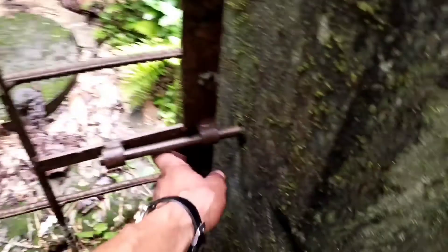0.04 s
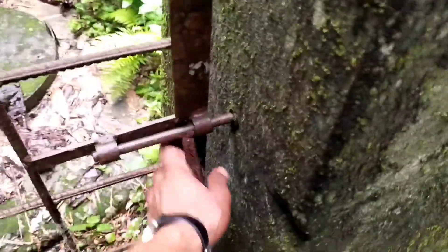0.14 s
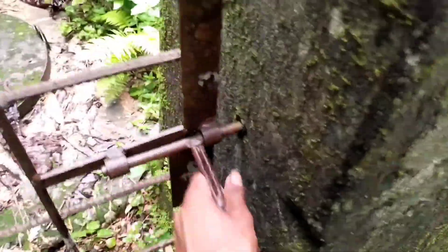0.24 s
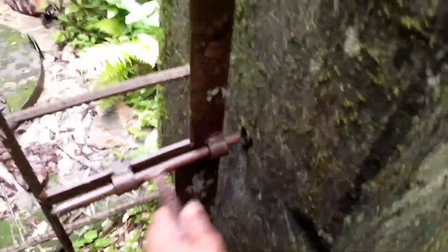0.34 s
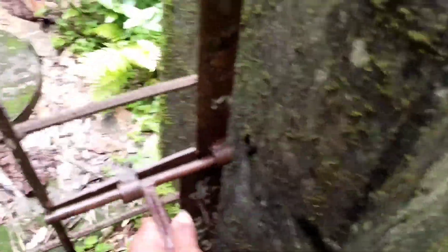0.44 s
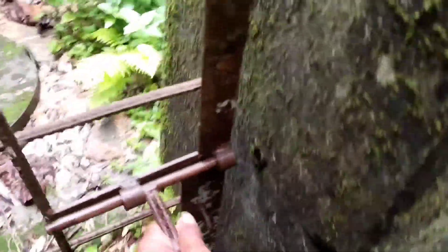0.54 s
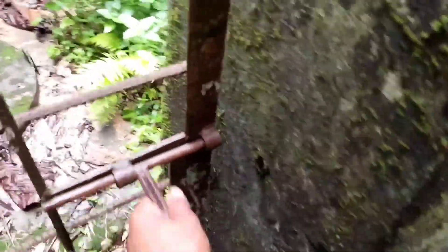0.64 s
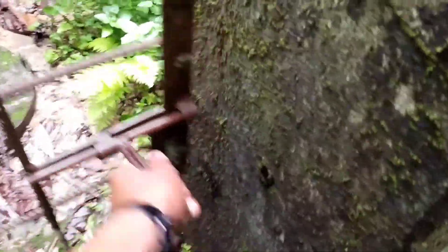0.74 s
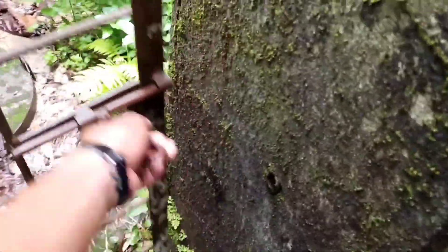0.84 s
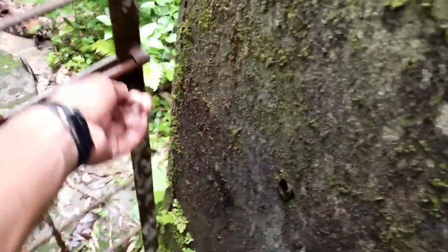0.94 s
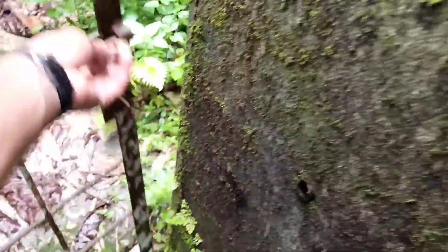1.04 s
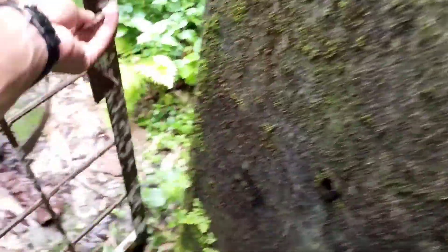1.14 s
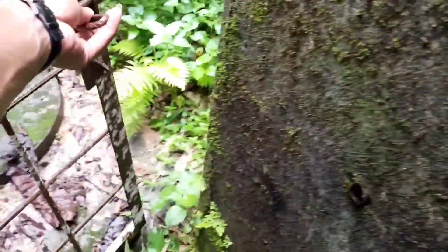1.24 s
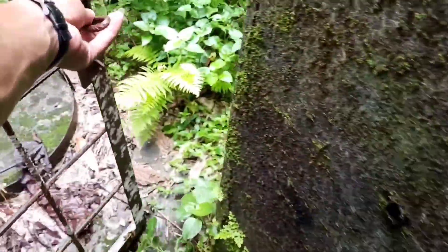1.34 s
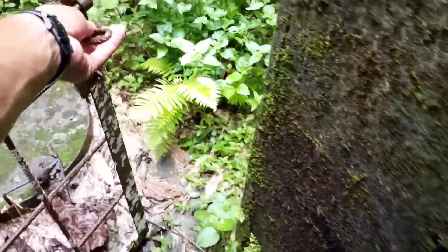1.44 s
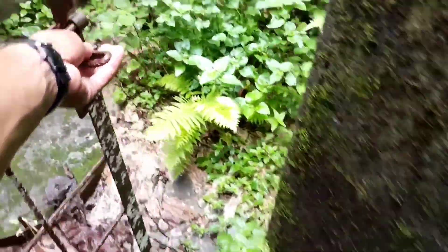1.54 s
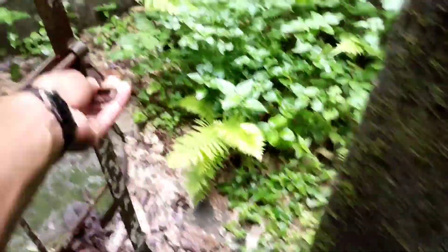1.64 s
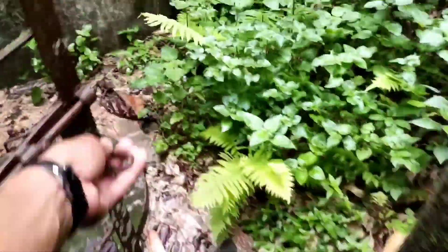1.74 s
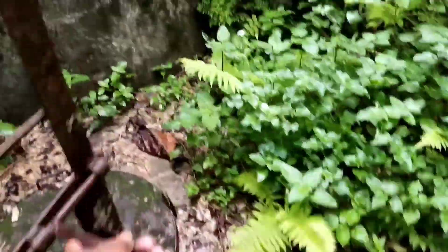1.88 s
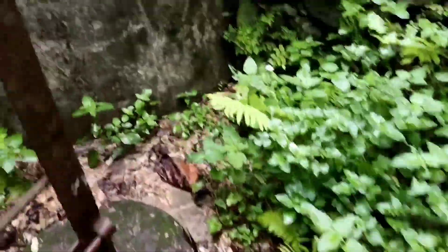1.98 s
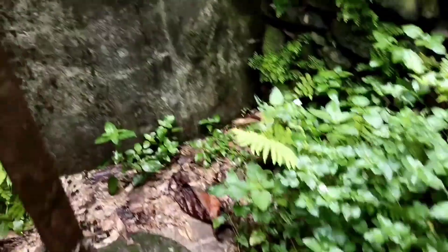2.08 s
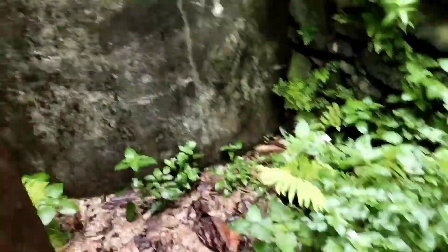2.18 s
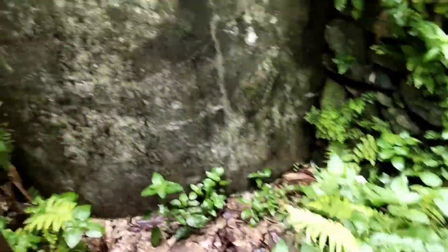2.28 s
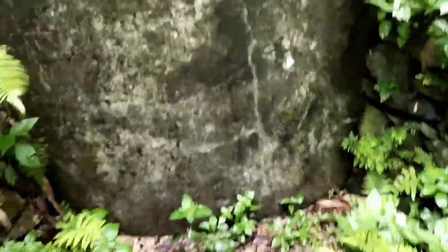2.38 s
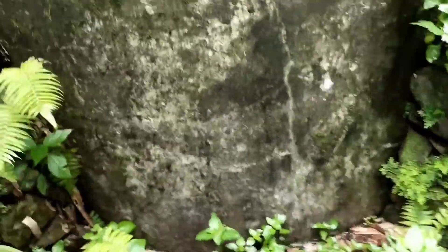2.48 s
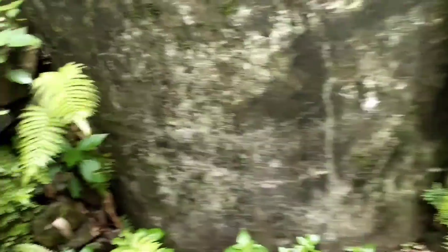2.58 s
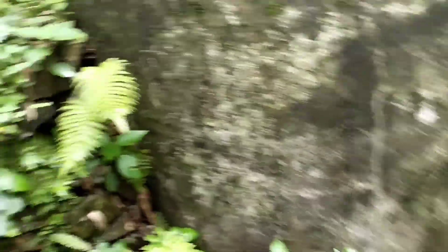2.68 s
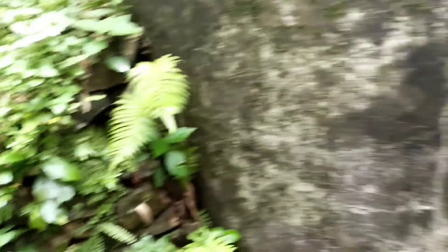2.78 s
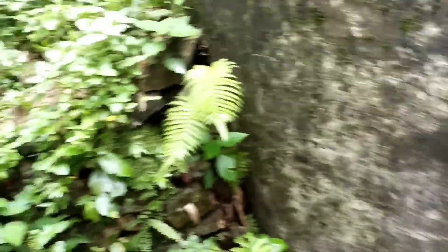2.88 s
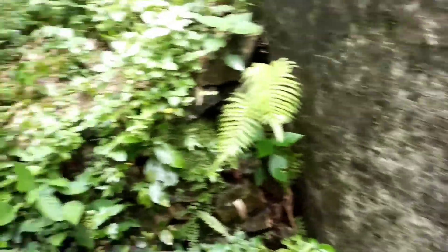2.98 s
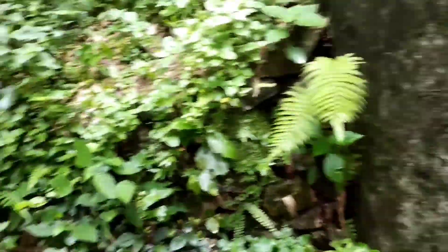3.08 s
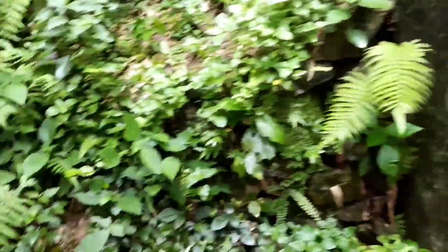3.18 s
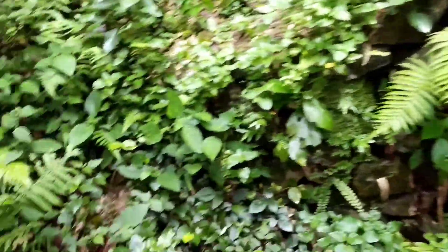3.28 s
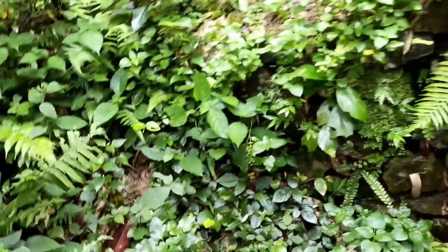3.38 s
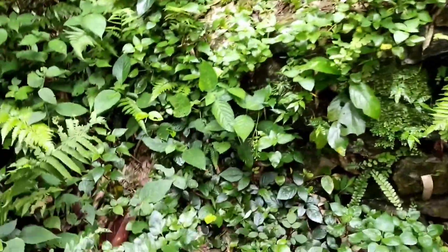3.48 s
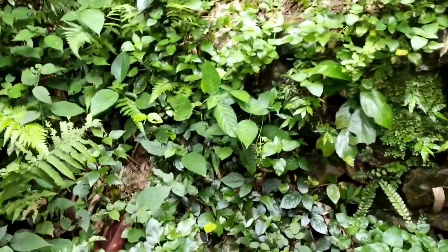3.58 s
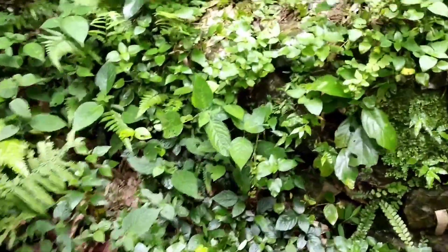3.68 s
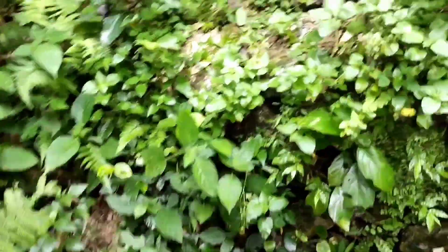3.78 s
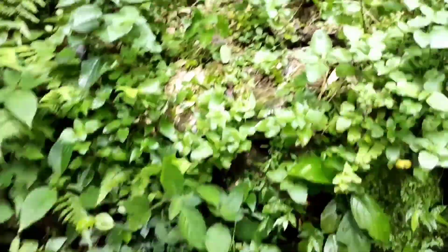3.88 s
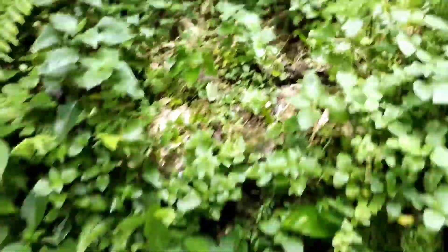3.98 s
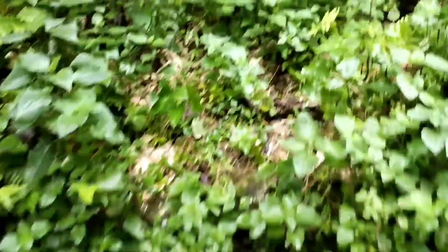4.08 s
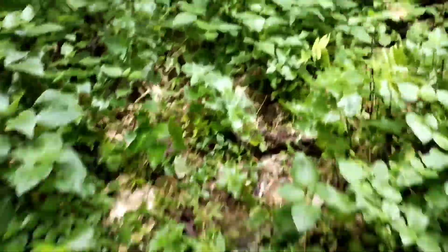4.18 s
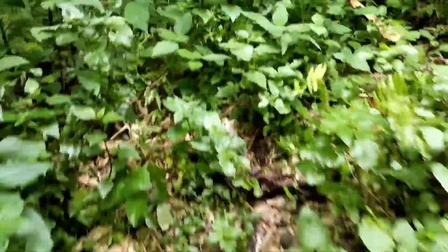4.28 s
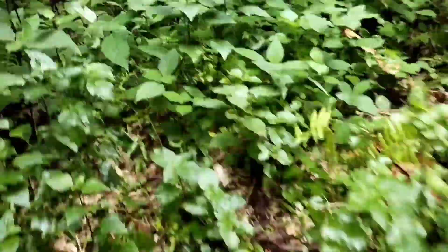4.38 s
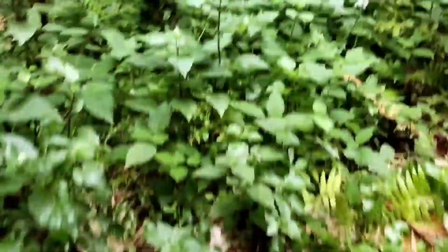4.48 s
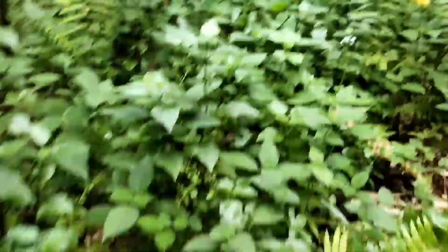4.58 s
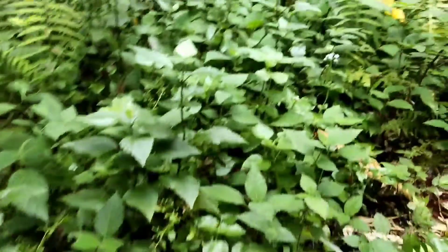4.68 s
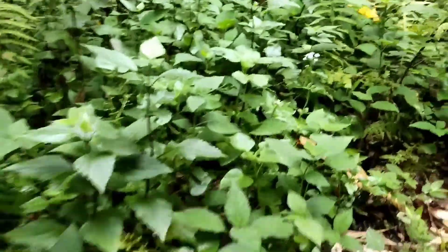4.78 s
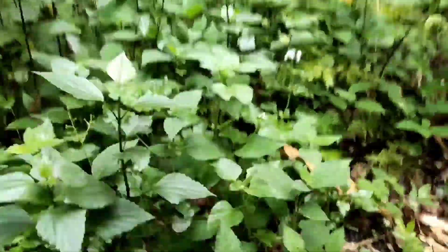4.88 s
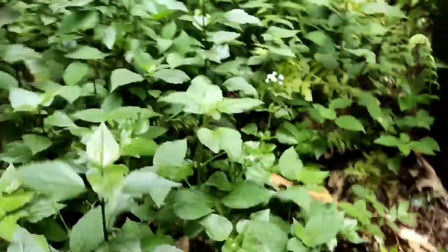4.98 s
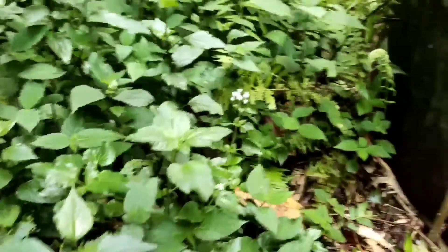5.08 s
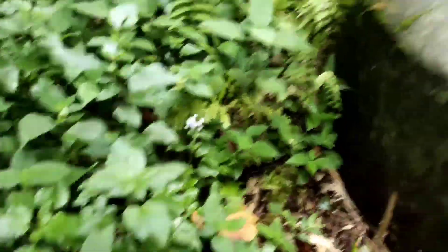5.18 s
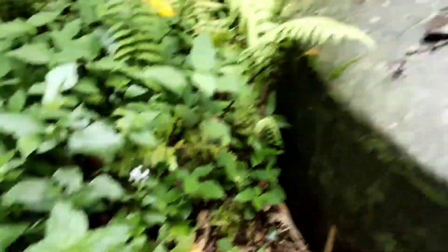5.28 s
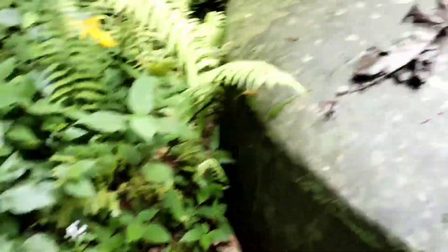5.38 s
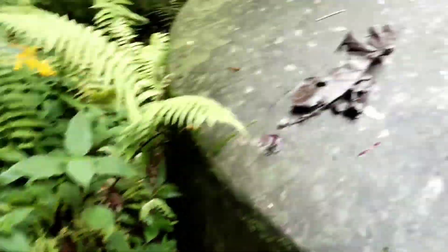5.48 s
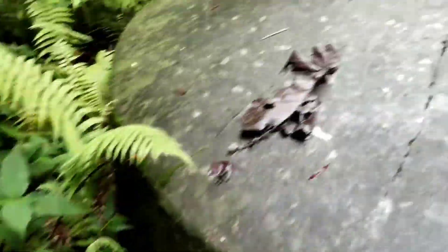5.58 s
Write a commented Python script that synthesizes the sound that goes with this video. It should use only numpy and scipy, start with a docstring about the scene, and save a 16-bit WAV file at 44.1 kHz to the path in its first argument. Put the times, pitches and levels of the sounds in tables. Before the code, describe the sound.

A close, handheld stereo recording in open, leafy surroundings. From 0.2 s a rusty iron bolt grates in uneven stick-slip clicks, with clinks at 0.27, 0.37 and 0.43 s and a quick pair near 0.5 s. At 0.54 s it hits its stop with the loudest, brightest clank; another knock follows at 0.64 s. The barred gate rings densely, inharmonically, and is stilled from about 0.9 s. Small dry clicks come around 1.0 s with a faint scrape. From 1.2 to 2.7 s there is low grip rubbing, soft rumble and leafy swishes, with a strong finger thump on the recorder at 2.3 s. Light iron rattles at 2.74 and 2.94 s lead to a hard double bang at 3.33 s, ringing away. Then undergrowth rustles, stones knock dully at 4.23, 4.64-4.77 and 4.9 s, and handling bumps end it at 5.6 s. Thin insect hiss continues throughout, ducking after loud peaks.

```python
"""Rusty bolt and barred gate

A rusty iron bolt scrapes back and clanks on its stop; the barred gate rings, rattles and later bangs: blows
and stick-slip clicks excite decaying modes and a dense crowd of lesser ones. A walk through undergrowth is
filtered noise (rustle, low wind and grip rubbing, far insects) with stones as dull modal knocks.
Fingers tapping the recorder are damped swings with a thin tick."""
import sys
import numpy as np
from scipy import signal
from scipy.fft import rfft, irfft
from scipy.io import wavfile
from scipy.ndimage import uniform_filter1d

SR = 44100
rng = np.random.default_rng(int(sys.argv[2]) if len(sys.argv) > 2 else 0)


def master(y):
    """Save y as 16-bit WAV."""
    cut = np.clip(np.atleast_2d(y).T, -1, 1)
    pcm = np.round(cut * 32767)  # scale
    wavfile.write(sys.argv[1], SR, pcm.astype(np.int16))


N = 248555


def gain_of(db):
    """Amplitude factor of a level in dB."""
    return 10 ** (np.asarray(db) / 20)


def evened(x):
    """Scales to an RMS of 1."""
    return x / np.sqrt(np.mean(abs(x) ** 2) + 1e-20)


def read(points, hz):
    """Interpolates a (frequency, value) table over log frequency."""
    f, value = np.transpose(points)
    return np.interp(np.log(hz + 1), np.log(f + 1), value)


def add(mix, start_s, sound):
    """Adds a two-channel sound in place, cut at the end of the mix."""
    part = mix[:, round(start_s * SR):][:, :sound.shape[1]]
    part += sound[:, :part.shape[1]]


def sides(pan_db):
    """Left and right gains for a left-right level difference."""
    return gain_of(np.multiply.outer([.5, -.5], pan_db))


def swell(t, start_s, length_s, attack_s, release_s):
    """Rises linearly, holds and dies exponentially."""
    rise = np.clip((t - start_s) / attack_s, 0, 1)
    return rise * np.exp(-np.maximum(t - start_s - length_s, 0) / release_s)


def hiss(spectrum, level, size, patchy_db, flicker_db):
    """Two-channel noise from random short-time spectra; level(t, hz) shapes it, patches drift, frames flicker."""
    # likeness of left and right noise: (frequency [Hz], correlation [0-1])
    likeness = [(60, 0.34), (180, 0.96), (550, 0.7), (1650, 0.012), (4970, 0.013), (15000, 0.03)]
    hop = size // 4
    frames, hz = N // hop + 5, np.fft.rfftfreq(size, 1 / SR)[:, None]
    a, b, c, d, patches = rng.standard_normal((frames, len(hz), 5)).T
    patches = uniform_filter1d(patches, size=size // 80, axis=0)
    patches = evened(uniform_filter1d(patches, size=9, axis=1))
    same = read(likeness, hz)
    left = a + 1j * b
    right = same * left + np.sqrt(1 - same ** 2) * (c + 1j * d)
    z = np.array([left, right])
    z *= gain_of(read(spectrum, hz) + patchy_db * patches + flicker_db * rng.standard_normal(frames))
    plain = signal.istft(z[0], nperseg=size, noverlap=size - hop)[1]
    z *= level(np.arange(frames) * hop / SR, hz) / np.sqrt(np.mean(plain ** 2))
    return signal.istft(z, nperseg=size, noverlap=size - hop)[1][:, :N]


def rustle():
    """Patchy friction noise of undergrowth; the treble share follows what is brushed."""
    # noise colour of leaves: (frequency [Hz], density [dB per Hz])
    leaf_spectrum = [(180, 2.5), (300, 7.5), (433, 6), (762, 2.5), (1030, 7.5), (1900, -3), (2570, -9),
                     (3640, -17.5), (5800, -12.5), (14700, -33), (16000, -41)]
    # brushes: (start [s], length [s], level [dB], treble lift [dB], left-right [dB])
    brushes = [(0, 0.21, -55.5, 20.5, 5.7), (1.2, 0.17, -59.5, 20.5, 4.9), (1.607, 0.13, -50.5, 19, 1.5),
               (1.8, 0.19, -59.5, 22.5, 5.5), (2.095, 0.15, -56, 23, 2.7), (2.231, 0.027, -38.5, 2.5, 0.44),
               (2.399, 0.14, -57, 17, 2), (3.7, 0.14, -69, 26.5, 6.1), (4.302, 0.079, -58.5, 22.5, 2.9),
               (4.38, 0.025, -50, 13.5, 2), (4.47, 0.016, -50.5, 6, 1.7), (4.64, 0.054, -48, -35, 1.6),
               (4.78, 0.27, -60.5, 21, 3.9), (4.928, 0.061, -44.5, 9.5, 2), (5.3, 0.16, -57, -26, 1)]
    sweep_in_s, sweep_out_s = 0.012, 0.077
    stir_db, stir_treble_db, stir_pan_db = -70.5, 24, 8  # the faint brushing that never stops

    def level(t, hz):
        treble = np.clip(np.log2(hz / 1174.0 + 1e-3), 0, 1)
        stir = gain_of(stir_db + treble * stir_treble_db) * sides(stir_pan_db)[:, None, None]
        power = stir ** 2
        for start_s, length_s, db, treble_db, pan_db in brushes:
            brush = gain_of(db + treble * treble_db) * swell(t, start_s, length_s, sweep_in_s, sweep_out_s)
            power = power + (brush * sides(pan_db)[:, None, None]) ** 2
        return np.sqrt(power)
    return hiss(leaf_spectrum, level, size=512, patchy_db=3.0, flicker_db=-1.9)


def wind():
    """Lumpy low noise in gusts; each shift of the grip adds a band of low rubbing."""
    # noise colour: (frequency [Hz], density [dB per Hz])
    rumble_spectrum = [(12, -62), (20, -32), (38, -81), (87, -1), (192, -7.5), (426, -11.5), (604, -10),
                       (654, -53), (900, -5), (1170, -41), (1980, -120)]
    # level of the low rumble, dipping while the iron is loud: (time [s], level [dB])
    rumble_levels = [(0, -51), (.12, -55), (.3, -76), (.8, -60), (.95, -41.5), (1.25, -51.5), (1.6, -48.5),
                     (2.1, -52), (2.5, -58.5), (2.95, -67), (3.2, -46.5), (3.31, -49.5), (3.38, -76),
                     (3.62, -61), (3.86, -47), (4.5, -46), (5.0, -44), (5.35, -56.5), (5.64, -41)]
    # rubbing, as of a hand on the case: (start [s], length [s], hump centre [Hz], level [dB])
    grips = [(0.032, 0.05, 300, -74), (0.861, 0.16, 226, -41.5), (1.285, 0.35, 208, -42),
             (1.564, 0.13, 356, -43.5), (1.82, 0.23, 236, -50.5), (2.235, 0.043, 348, -63),
             (2.324, 0.29, 262, -50), (2.64, 0.094, 257, -52), (2.803, 0.027, 545, -38.5),
             (3.006, 0.11, 232, -50), (3.646, 0.13, 257, -44), (3.89, 0.14, 231, -43),
             (4.175, 0.041, 298, -47), (4.383, 0.15, 470, -40.5), (4.537, 0.06, 297, -40),
             (4.752, 0.31, 360, -43.5), (5.41, 0.12, 327, -50)]
    grip_in_s, grip_out_s, grip_octaves = 0.023, 0.017, 0.57
    gusts_db, upper_bass_db = 2, -12  # random lumps; gain from 240 Hz up against 60 Hz

    def level(t, hz):
        gusts = evened(uniform_filter1d(rng.standard_normal(len(t)), size=9))
        tilt_db = np.clip(np.log2(hz / 60. + 1e-3) / 2, 0, 1) * upper_bass_db
        rumble_db = np.interp(t, *np.transpose(rumble_levels)) + gusts_db * gusts
        power = gain_of(rumble_db + tilt_db) ** 2
        for start_s, length_s, hump_hz, db in grips:
            hump = np.exp(-(np.log2(hz / hump_hz + 1e-3) / grip_octaves) ** 2)
            grip = gain_of(db) * hump * swell(t, start_s, length_s, grip_in_s, grip_out_s)
            power = power + grip ** 2
        return np.sqrt(power)
    return hiss(rumble_spectrum, level, size=1024, patchy_db=0.5, flicker_db=0.5) * sides(0.14)[:, None]


def forest():
    """Far insects and leaves: a steady hiss with a hump in the treble and narrow wavering bands."""
    # noise colour: (frequency [Hz], density [dB per Hz])
    forest_spectrum = [(180, 6.5), (300, 7), (737, -4), (1030, 4), (1750, -3.5), (2880, -14.5), (4300, -5),
                       (5160, -15.5), (6200, -14.5), (7080, -4), (9550, -9), (10400, -7), (14500, -14.5),
                       (15200, -29), (16000, -68)]
    # insect song bands: (centre [Hz], width [Hz], mean gain over the hiss [dB])
    insects = [(2990, 390, 18.5), (5600, 783, 25.5), (5740, 320, -10.5), (6940, 550, 10)]
    forest_db, sway_share = -55, .14  # the song's dB gain sways by this share

    def level(t, hz):
        sway = evened(uniform_filter1d(rng.standard_normal((len(insects), len(t))), size=60, axis=1))
        song_db = 0
        for (centre_hz, width_hz, db), w in zip(insects, sway):
            song_db = song_db + db * (1 + sway_share * w) * np.exp(-((hz - centre_hz) / width_hz) ** 2)
        return gain_of(forest_db + song_db)
    return hiss(forest_spectrum, level, size=512, patchy_db=2.5, flicker_db=0.0)


def stones():
    """Dull knocks: quickly dying spread modes around a close group that rings on its own decay, then grit."""
    # knocks as of stones and twigs underfoot:
    # (time [s], level [dB], left-right [dB], pitch [Hz], ring t60 [s], ring level [dB])
    knocks = [(0.162, -31, 11, 2850, 0.076, -15), (4.234, -40, 9, 2020, 0.14, -14.5),
              (4.638, -24.5, -8, 1357, 0.24, -20), (4.704, -30.5, 13, 1958, 0.35, -21),
              (4.765, -46, 12, 1900, 0.19, -8), (4.908, -21.5, -5, 1093, 0.072, -17)]
    knock_t60_s = 0.074
    out, t = np.zeros((2, N)), np.arange(6000) / SR
    for start_s, db, pan_db, hz, ring_t60_s, ring_db in knocks:
        spread, turn = rng.uniform(-1.0, 1, (2, 40, 1))
        weight = np.exp(-((spread + 0.23) / 0.85) ** 2)
        crowd = (weight * np.sin(2 * np.pi * hz * 2.7 ** spread * t + np.pi * turn)).sum(0)
        group = np.sin(2 * np.pi * hz * (1 + .035 * spread[:3]) * t).sum(0)
        knock = 0.086 * crowd * gain_of(-60 * t / knock_t60_s)
        knock += gain_of(ring_db) * group * gain_of(-60 * t / ring_t60_s)
        grit = rng.standard_normal(2000) * (rng.random(2000) < 500. / SR)  # sparse repeats of the knock
        grit *= np.exp(-t[:2000] / 0.012) * 0.17
        grit[0] = 1
        knock = signal.fftconvolve(knock * (1 - np.exp(-t / 0.00023)), grit)
        add(out, start_s, gain_of(db) * sides(pan_db)[:, None] * knock)
    return out


def taps():
    """Fingers and jolts on the case: a quick push inward, a slower rebound and a thin tick."""
    # (time [s], left level [dB], left-right of the push [dB], nominal pitch [Hz], tick level [dB])
    case_taps = [(0.210, -14.5, 23, 474, -15), (0.414, -26, -1, 280, -23), (0.544, -8.5, -16, 890, -23),
                 (1.919, -26, 40, 221, -19), (2.307, 1.5, 24, 480, -17), (3.891, -12.5, 25, 394, -25),
                 (4.910, -21, 0, 890, -23), (5.600, -7.5, 52, 563, -24), (5.615, 2.5, 23, 432, -18.5)]
    out, t = np.zeros((2, N)), np.arange(600) / SR
    for start_s, db, pan_db, hz, tick_db in case_taps:
        turns = 1.076 * (hz * t) ** 0.61  # the swing slows as it dies
        push = -np.sin(2 * np.pi * turns) * np.exp(-(1.69 * hz * t) ** 1.54)
        push *= 1 - np.exp(-t / 0.00032)
        tick_hz = np.array([[6000.], [8500.]])  # left, right
        tick = gain_of(tick_db) * np.sin(2 * np.pi * tick_hz * t) * np.exp(-t / 0.00061)
        pushes = gain_of(db - np.array([[0], [pan_db]])) * push
        add(out, start_s, pushes + gain_of(db) * tick * [[1], [.6]])
    return out


def iron(times, modes_db=2.5):
    """Gate rings, one per blow or stroke, coloured by where it is struck; (ring, channel, time)."""
    # strong modes: (frequency [Hz], gain over the crowd's colour struck at the bolt [dB], at its stop [dB],
    # at the frame [dB], longest t60 [s])
    gate_modes = [(423, 2, 16, 2, 1.6), (448, -1, 5, 8, 1.6), (512, 7, 9, 3, 1.6), (577, 3, 10, 1, 1.6),
                  (652, 2, 10, 6, 1.6), (674, 6, 7, 11, 1.6), (698, 8, 13, 8, 1.6), (736, 1, 0, 11, 1.6),
                  (805, -1, 8, 11, 1.6), (824, 0, 9, 7, 1.6), (849, 2, 13, 6, 1.6), (927, 1, 3, 10, 1.5),
                  (959, 5, 10, -3, 0.93), (1077, 3, 12, 4, 1.6), (1137, 5, 8, 10, 1.18),
                  (1207, 3, 14, -2, 1.6), (1268, 8, 10, 9, 0.92), (1287, 9, 5, 8, 1.36),
                  (1385, 2, 10, 0, 0.7), (1419, 4, 7, 13, 1.01), (1454, 0, 0, 9, 0.67),
                  (1578, 6, 10, 4, 0.58), (1705, -1, 0, 9, 1.05), (1734, 8, 0, 4, 1.6),
                  (1783, 5, 10, 7, 0.92), (1809, 2, 10, 13, 0.63), (1855, 3, 6, 14, 0.4),
                  (1902, 0, 3, 12, 0.4), (1971, 4, 8, -1, 1.41), (2038, 3, 0, 13, 0.47),
                  (2095, 7, 14, -2, 1.13), (2110, 10, 0, 4, 0.6), (2141, 8, 9, 7, 0.79),
                  (2186, 3, 5, 9, 0.53), (2224, 2, 10, 7, 1.6), (2298, 2, 3, 12, 0.35),
                  (2340, 6, 6, 9, 1.06), (2372, 0, 4, 8, 0.4), (2407, 0, 8, 1, 0.7), (2485, 5, 5, 12, 0.45),
                  (2536, 3, 10, 0, 0.72), (2570, 2, 10, 2, 0.6), (2652, 1, 2, 9, 0.52),
                  (2687, 2, 8, 9, 1.6), (2722, 12, 6, 3, 0.64), (2750, 10, 8, -1, 0.44),
                  (2765, 1, 9, 5, 0.71), (2896, 0, 8, 3, 0.5), (2929, -5, 7, 13, 0.48),
                  (2967, 8, 0, 1, 0.87), (3021, -1, 2, 9, 0.62), (3075, 8, 6, 2, 0.38),
                  (3150, 0, 9, 6, 0.72), (3400, 9, 3, 0, 0.3), (3433, -4, 5, 19, 0.27),
                  (3508, 12, -1, -4, 0.91), (3554, 7, 4, 9, 0.34), (3782, 3, 1, 10, 0.34),
                  (3880, 4, 2, 13, 0.35), (3904, 12, 5, 6, 0.52)]
    # colour of the lesser modes of bars and frame: (frequency [Hz], level [dB])
    crowd_colour = [(350, -40), (450, -25), (590, -21), (680, -12.5), (850, -9.5), (1090, -8.5),
                    (1430, -8.5), (1750, -7.5), (2050, -3), (2300, -1.5), (2700, -3.5), (3300, -6.5),
                    (3900, -13.5), (8500, -14.5), (12500, -29), (16000, -47)]
    # decay of iron, before the factors below: (frequency [Hz], t60 [s])
    iron_t60 = [(500, 0.82), (760, 1.0), (1200, 0.48), (1700, 0.53), (2300, 0.58), (3200, 0.31),
                (6000, 0.17), (10000, 0.15), (15000, 0.12)]
    # the left microphone hears the gate later as the recorder turns: (time [s], lag [ms])
    left_lag = [(1.5, 0.076), (2.5, 0.434)]
    # the bolt reaches its stop; the gate swings away: (time [s], time [s])
    place_changes_s = (0.53, 2.0)
    frame_hz, frame_db, scatter_db = 990, 0.5, 2
    wobble_rad, ridges_db, shared = 0.3, 2.0, 0.24
    crowd_damping = 1.15  # the lesser modes die this much faster

    count, (hz, *places_db, t60_s) = len(times), np.transpose(gate_modes)
    place = np.searchsorted(place_changes_s, times)
    db = read(crowd_colour, hz) + np.array(places_db)[place][:, None]
    t = np.arange(24576) / SR
    t60_s = np.minimum(t60_s, 0.97 * read(iron_t60, hz))  # rust damps all alike
    # loose joints make each strong mode waver, the high ones more
    waver = evened(uniform_filter1d(rng.standard_normal((len(hz), len(t))), size=1500, axis=1))
    waver_rad = wobble_rad * (hz[:, None] + 4000.) / 4000 * waver
    modes = np.exp(np.outer(2j * np.pi * hz - np.log(1000) / t60_s, t) + 1j * waver_rad)
    scatter = scatter_db * rng.standard_normal((count, 2, len(hz)))
    turn = rng.random((count, 2, len(hz)))
    # the frame's low modes hum wherever the gate is struck: less scatter
    db = db + np.where(hz < frame_hz, frame_db + scatter / 3, scatter)
    strong = (gain_of(db) * np.exp(2j * np.pi * turn) @ modes).real

    # the lesser modes lie too close to part: noise that dies band by band
    f, frame_s, z = signal.stft(rng.standard_normal((count, 2, len(t) + 1024)), SR, nperseg=512)
    decay_db = 60 * crowd_damping * (frame_s - 1024 / SR) / read(iron_t60, f)[:, None]
    # random bunching, drawn anew for each ring
    ridges = evened(uniform_filter1d(rng.standard_normal((count, 1, len(f), 1)), size=3, axis=2))
    z = z * gain_of(read(crowd_colour, f)[:, None] + ridges_db * ridges - decay_db)
    crowd = signal.istft(z, SR, nperseg=512)[1][..., 1024:len(t) + 1024]
    rings = evened(crowd) + gain_of(modes_db) * evened(strong)

    # both microphones hear part of the same ring
    lag_s = np.interp(times, *np.transpose(left_lag)) / 1000
    delay = np.exp(-2j * np.pi * np.outer(lag_s, np.fft.rfftfreq(len(t), 1 / SR)))
    late = irfft(rfft(rings[:, 1]) * delay)
    left = shared * late + np.sqrt(1 - shared ** 2) * rings[:, 0]
    rings = np.stack([left, rings[:, 1]], axis=1)
    return evened(rings) / np.sqrt(len(t))  # mean energy 1


def coloured(x, low_db, low_middle_db, middle_db, high_db, top_db):
    """Raises or lowers groups of modes against the main ones near 2500 Hz."""
    hz = (480, 700, 880, 1250, 1800, 2100, 3100, 5000, 10000)
    db = (low_db, low_db, low_db, low_middle_db, middle_db, 0, 0, high_db, top_db)
    size = 2 * x.shape[-1]
    gain = gain_of(read(np.transpose([hz, db]), np.fft.rfftfreq(size, 1 / SR)))
    return irfft(rfft(x, size) * gain, size)[..., :size // 2]


def grinding():
    """Scraping bolt and later rattling gate: uneven clicks that keep the iron ringing."""
    # strokes: (start [s], length [s], level [dB], low [dB], low middle [dB], high and top [dB])
    strokes = [(0.234, 0.0048, -20.5, -22.5, 1, -5.5), (0.27, 0.32, -35, -0.5, 12.5, -29),
               (0.427, 0.08, -20, 2, 1, -21), (0.529, 0.38, -43.5, 6, 9.5, 4),
               (1.05, 0.22, -48, -28, -7, 8), (2.736, 0.16, -40.5, 2.5, 7, -13),
               (2.921, 0.17, -45.5, -7, 10, 1), (3.115, 0.22, -53, -25, 11.5, 7.5),
               (3.337, 0.12, -27, 6, 6, -6)]
    bite_s, let_go_s = 0.022, 0.037  # a stroke takes hold and lets go
    held_db_per_s = 9  # rubbing iron damps its own ring
    out, t = np.zeros((2, N)), np.arange(SR // 2) / SR
    rings = iron([row[0] for row in strokes], modes_db=-4.5)
    for (start_s, length_s, db, low_db, low_middle_db, high_db), ring in zip(strokes, rings):
        slips = gain_of(3.6 * np.minimum(rng.exponential(1, len(t)), 4))
        slips *= rng.random(len(t)) < 450. / SR  # about 450 slips a second
        slips = evened(slips * rng.choice([-1., 1.], len(t))) * swell(t, 0, length_s, bite_s, let_go_s)
        ring = coloured(ring, low_db, low_middle_db, low_middle_db / 2, high_db, high_db)
        ring = ring * gain_of(-held_db_per_s * np.arange(ring.shape[1]) / SR)
        scrape = signal.fftconvolve(slips[None], ring, axes=1)
        add(out, start_s, gain_of(db) * sides(0.33)[:, None] * scrape)
    return out


def blows():
    """Each blow excites all modes, the low ones building up more slowly; the loose iron chatters after it."""
    # blows on the iron: (time [s], level [dB], left-right [dB], chatter decay [s],
    # extra damping [dB/s, sign ignored], low [dB], low middle [dB], middle [dB], high [dB], top [dB],
    # favoured modes [Hz], their lift [dB], left-right of the treble [dB], snap [dB])
    blow_rows = [(0.266, 6.5, 5, 0.026, 10, -15, 9, 3.5, 14.5, -14, 2020, 9, -1, -33),
                 (0.365, 10, 0.5, 0.04, 7, 3, -2, 1.5, -10, -37, 2400, 4.5, 0, -33),
                 (.430, 20.5, 5, 0.12, 26, -12, -3, 7.5, 5, -10, 2700, 4.5, -5, -30),
                 (.494, 12, 5, 0.004, 20, -16, 7.5, -15, -25, -27, 2220, 5, 0, -17.5),
                 (.503, 6, 8, 0.004, 30, -2, 0, -8, -12, -22, 2300, 2, 0, -22),
                 (.538, 31.5, -1.5, 0.011, -25, -4.5, -4, -1.5, 5, 8, 3000, 4, -2, -39),
                 (.640, 18.5, 1, 0.038, 3.5, 4.5, 2.5, 2.5, 2, -8, 2400, 4, -2, -42),
                 (0.981, 0.5, 5, 0.0062, 46, -17, -5, -11, 2, -7, 2630, 3.5, 0, -30),
                 (1.030, 5.5, 5, 0.0016, 28, -17, -22, -9, 6.5, -10, 2770, 4.5, 1, -28),
                 (1.057, -3, 2, 0.0034, 33, 0, -13, -8, -4, -7, 2120, 10, 2, -18.5),
                 (2.74, -2, 5, 0.035, 47, -1.5, 1, -9, 6.5, -9, 2420, 5, 0, -50),
                 (2.937, 3.5, 3.5, 0.0027, 52, -29, 7, 6.5, -14, -29, 1700, 6.5, 0, -30),
                 (2.951, -8, 5, 0.01, 88, -29, -1, 4, -10, -29, 2340, 8, 0, -32),
                 (3.331, 16.5, 2, 0.016, 6, 0, -2.5, -1.5, 14, 10.5, 2250, -20, -7, -43),
                 (3.341, 17.5, 7.5, 0.031, 12, -5, -6, -1.5, 8.5, 1.5, 2240, 5.5, -3, -32)]
    frame_hz, frame_build_s = 990, 0.01  # the low modes of the frame take up the blow slowly
    bars_hz, bars_build_s, bars_late = 3500, 0.003, 0.27  # so do the bars, in part and sooner
    favoured_width_hz = 260
    grab_s, grab_db_per_s = 0.9, 90  # a hand takes hold of the gate and stills it
    snap_hz, snap_s = 2290, 0.0007  # the short snap of bare contact

    out, t = np.zeros((2, N)), np.arange(24576) / SR
    hz = np.fft.rfftfreq(len(t), 1 / SR)
    frame = signal.butter(4, frame_hz, fs=SR, output="sos")
    bars = signal.butter(4, bars_hz, fs=SR, output="sos")
    snap = np.sin(2 * np.pi * snap_hz * t) * t / snap_s * np.exp(1 - t / snap_s)
    for row, ring in zip(blow_rows, iron([row[0] for row in blow_rows])):
        start_s, db, pan_db, chatter_s, damping_db_per_s, *colour_db = row[:10]
        favoured_hz, lift_db, treble_pan_db, snap_db = row[10:]
        lift = gain_of(lift_db * np.exp(-((hz - favoured_hz) / favoured_width_hz) ** 2))
        lean = sides(treble_pan_db * np.clip(np.log2(hz / 4900.0 + 1e-3), 0, 1))
        ring = coloured(irfft(rfft(ring) * lift * lean), *colour_db)
        ring = ring - signal.sosfiltfilt(frame, ring) * np.exp(-t / frame_build_s)
        ring = ring - bars_late * signal.sosfiltfilt(bars, ring) * np.exp(-t / bars_build_s)
        ring = ring * (1 - np.exp(-t / 0.0001)) * gain_of(-abs(damping_db_per_s) * t)
        ring = ring * np.clip((t[-1] - t) * 20, 0, 1)  # fade the last 50 ms
        if start_s < grab_s:
            ring = ring * gain_of(-grab_db_per_s * np.maximum(start_s + t - grab_s, 0))
        hits = rng.standard_normal(6000) * (rng.random(6000) < 400. / SR)  # about 400 hits a second
        hits *= np.exp(-t[:6000] / chatter_s)
        hits[0] = 3.2
        ring = signal.fftconvolve(ring, hits[None] / np.linalg.norm(hits), axes=1)
        ring[:, :len(t)] += gain_of(snap_db) * snap
        add(out, start_s, gain_of(db) * sides(pan_db)[:, None] * ring)
    return out


def scene():
    """All layers, each at its own level."""
    return rustle() + wind() + forest() + stones() + taps() + grinding() + blows()


def record(dry):
    """Gain control ducks everything after each loud peak; then bass loss, soft overload and the band limit."""
    threshold_db, recovery_db_per_s, duck_share = -39.0, 620.0, 0.24
    edge_hz = 16300
    power_db = 10 * np.log10(abs(uniform_filter1d((dry ** 2).max(0), size=40)) + 1e-12)
    fall_db = np.arange(N) * recovery_db_per_s / SR
    held_db = np.maximum.accumulate(power_db + fall_db) - fall_db
    over_db = np.maximum(held_db - threshold_db, 0)
    over_db = signal.lfilter([.01], [1, -.99], over_db)  # about 2 ms of smoothing
    ducked = dry / gain_of(duck_share * over_db)
    bass_cut = signal.butter(3, 70., "high", fs=SR, output="sos")  # small microphones lose bass
    ducked = signal.sosfilt(bass_cut, ducked)
    ducked = .75 * np.tanh(ducked / .75)  # soft overload
    band_limit = signal.firwin(511, edge_hz, window=("kaiser", 9), fs=SR)
    return signal.oaconvolve(ducked, band_limit[None], "same")


dry = scene()
out = record(dry)
master(out)
```